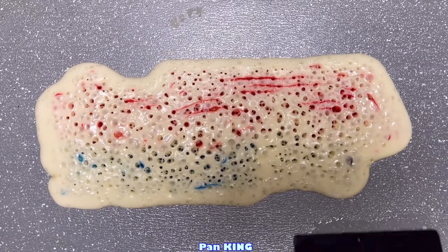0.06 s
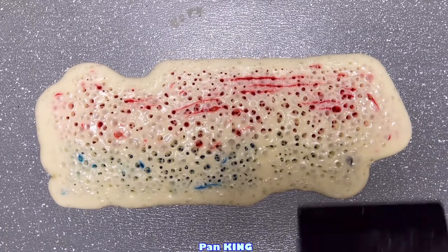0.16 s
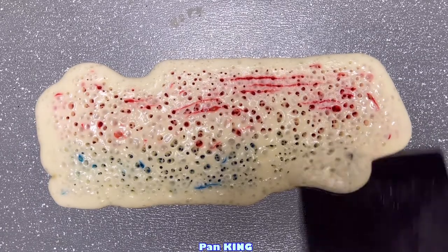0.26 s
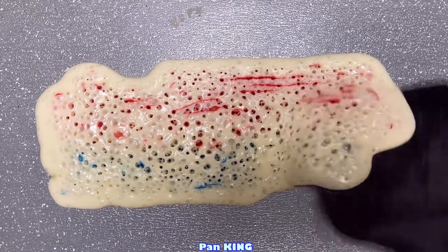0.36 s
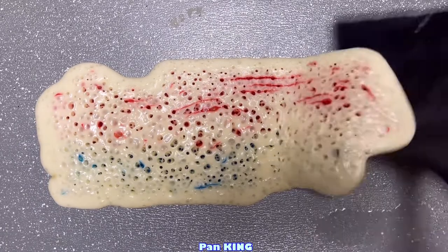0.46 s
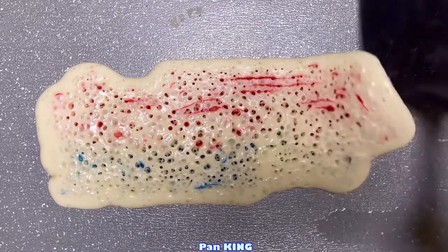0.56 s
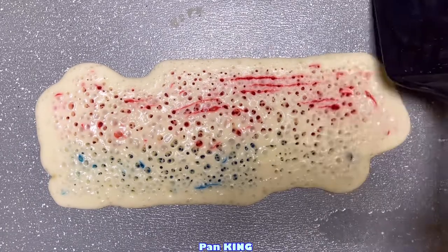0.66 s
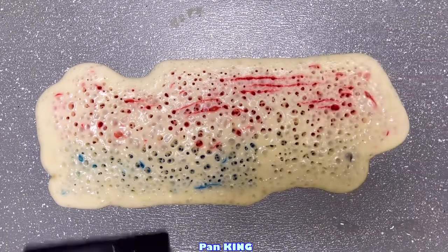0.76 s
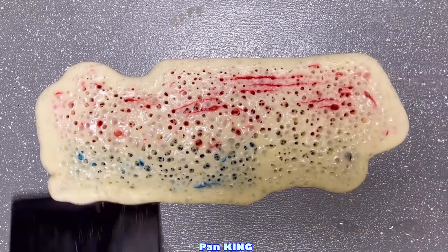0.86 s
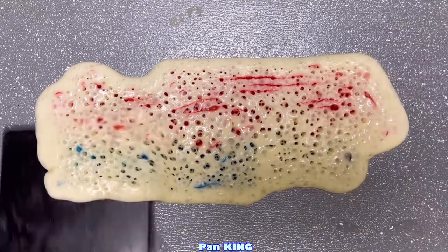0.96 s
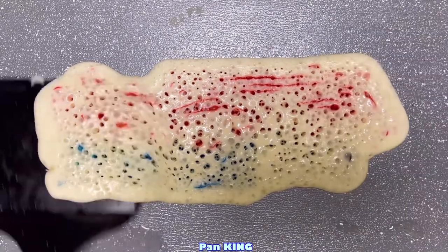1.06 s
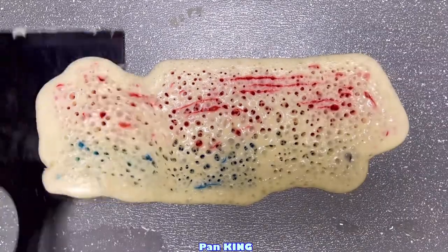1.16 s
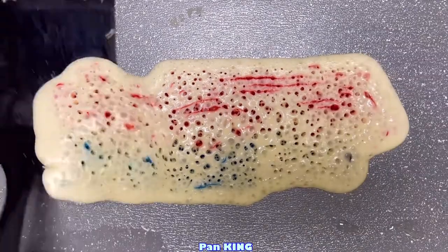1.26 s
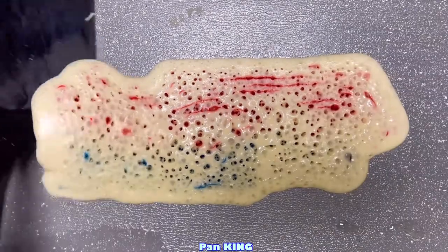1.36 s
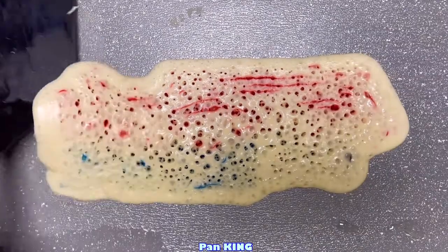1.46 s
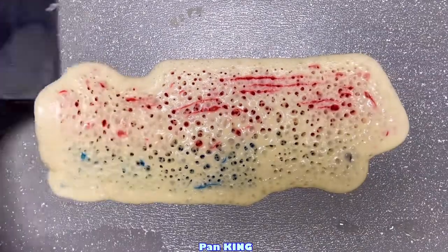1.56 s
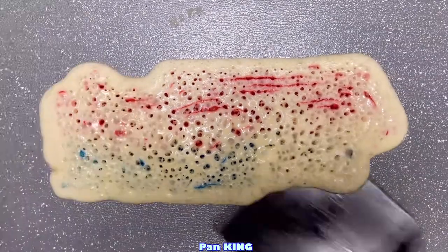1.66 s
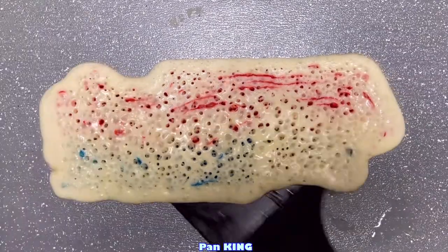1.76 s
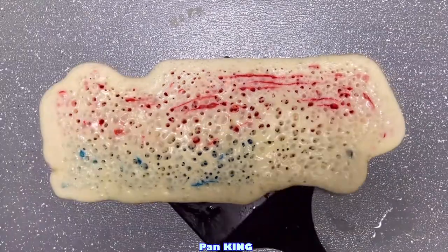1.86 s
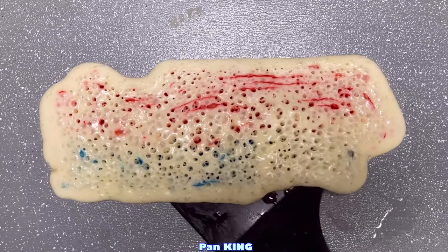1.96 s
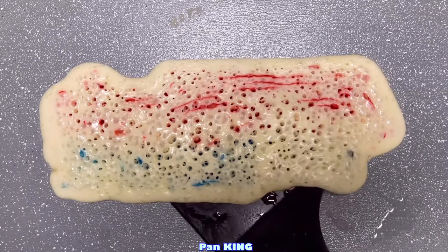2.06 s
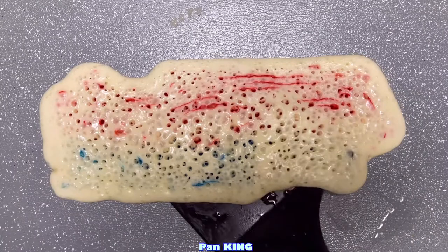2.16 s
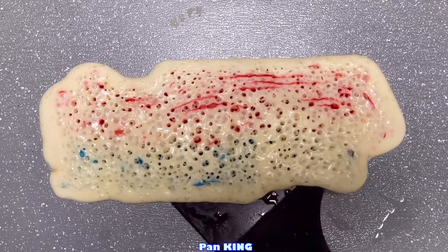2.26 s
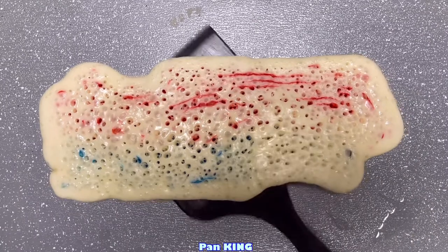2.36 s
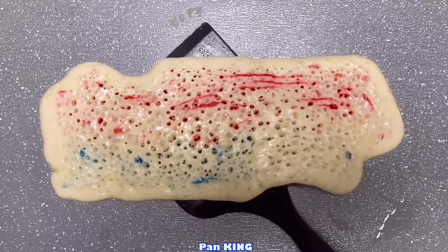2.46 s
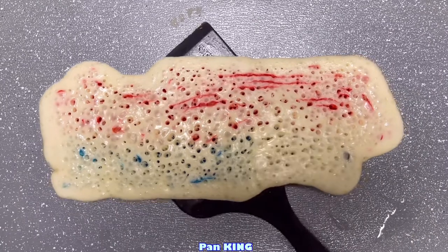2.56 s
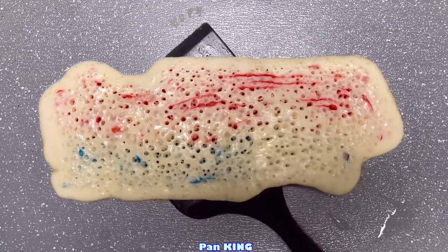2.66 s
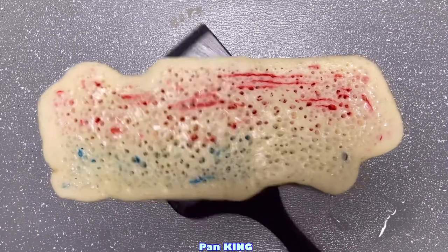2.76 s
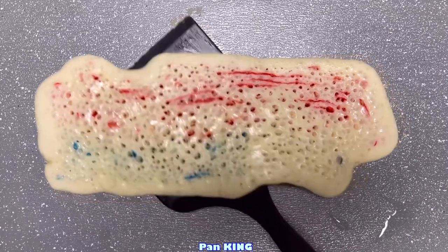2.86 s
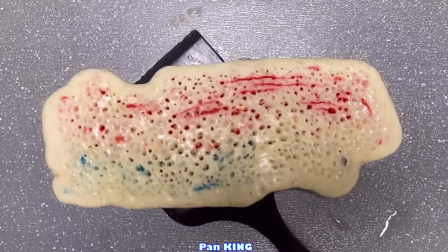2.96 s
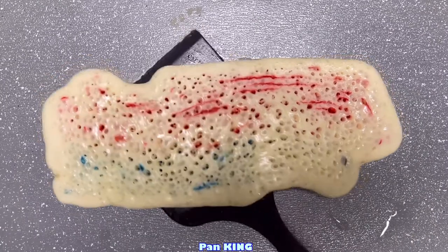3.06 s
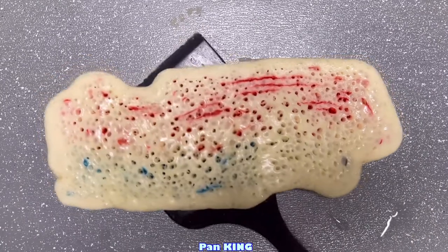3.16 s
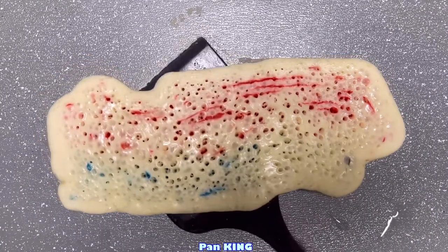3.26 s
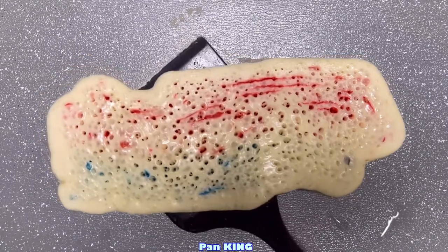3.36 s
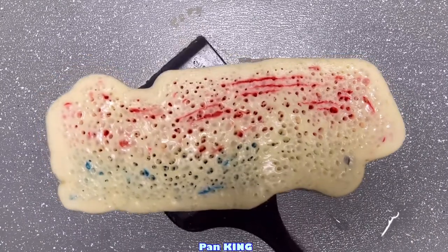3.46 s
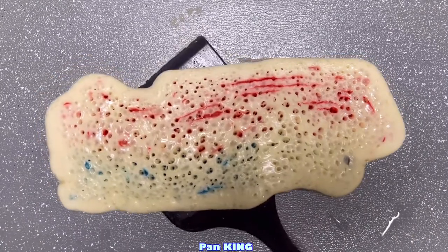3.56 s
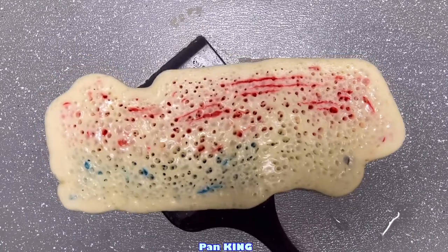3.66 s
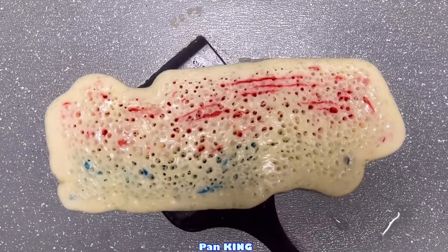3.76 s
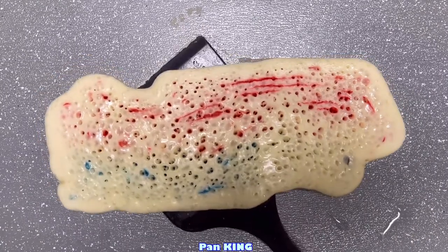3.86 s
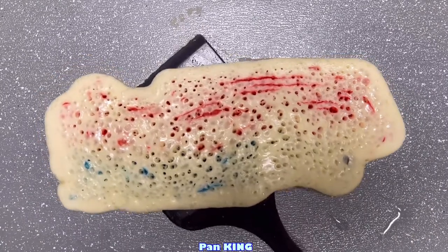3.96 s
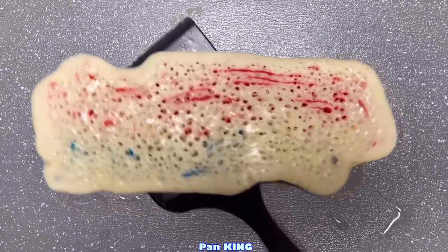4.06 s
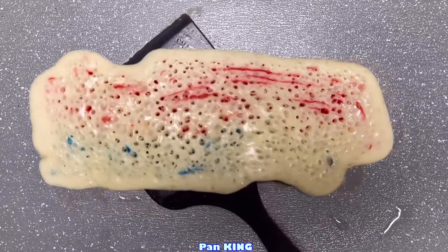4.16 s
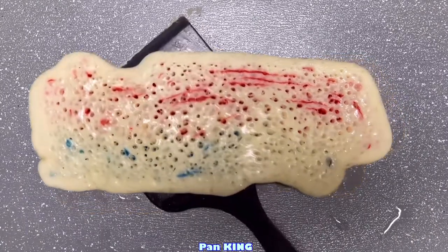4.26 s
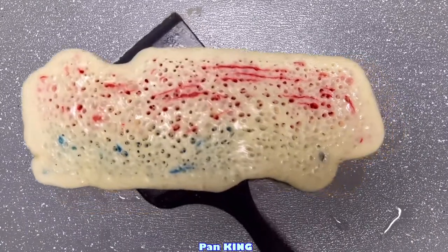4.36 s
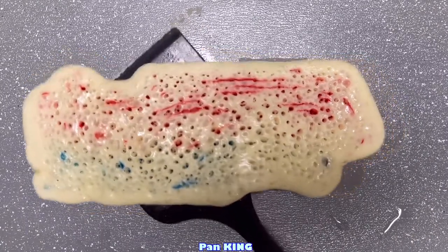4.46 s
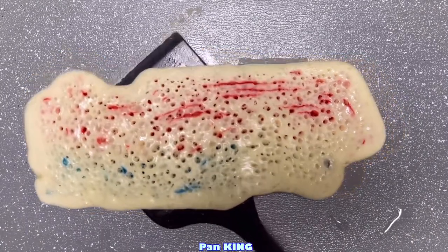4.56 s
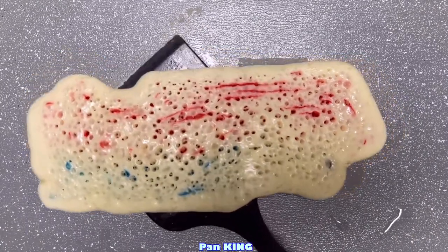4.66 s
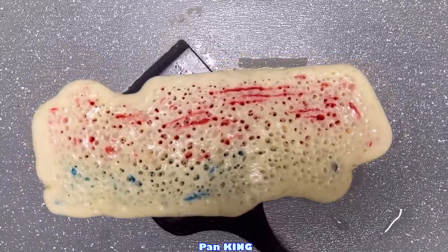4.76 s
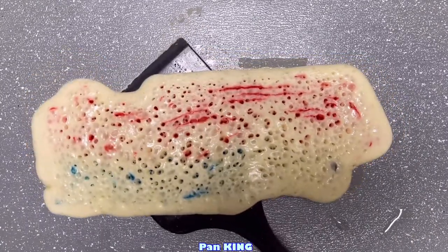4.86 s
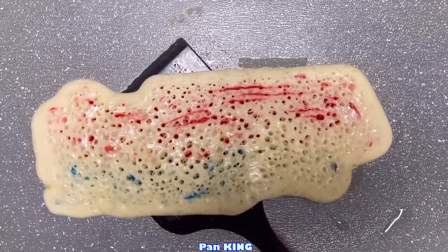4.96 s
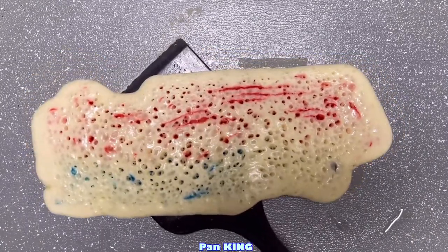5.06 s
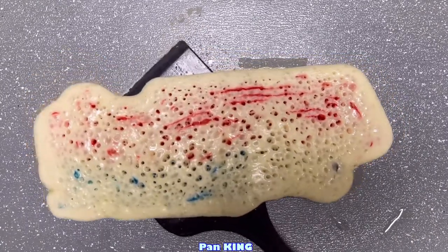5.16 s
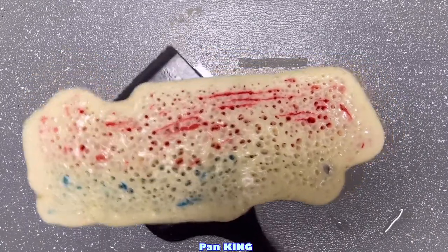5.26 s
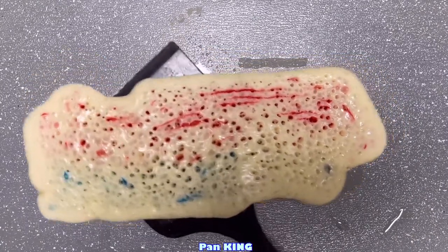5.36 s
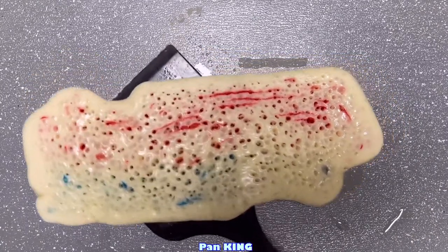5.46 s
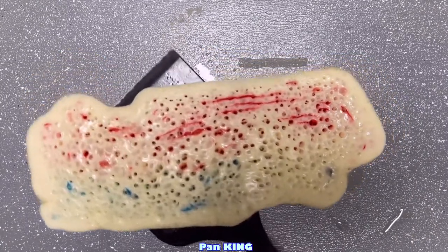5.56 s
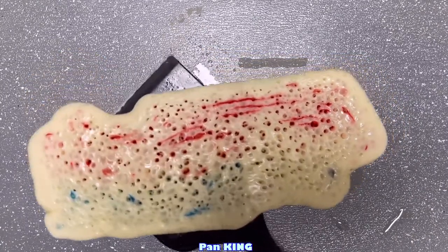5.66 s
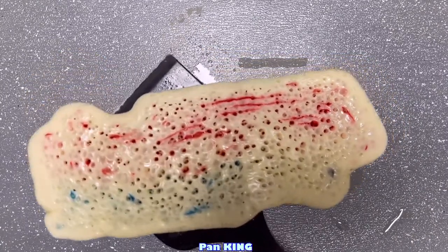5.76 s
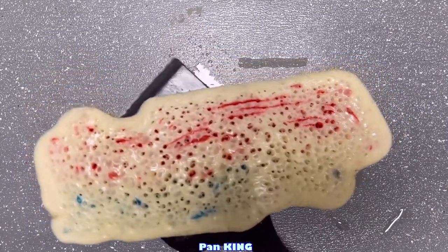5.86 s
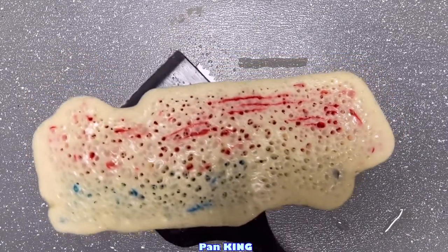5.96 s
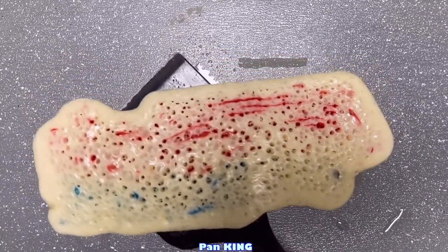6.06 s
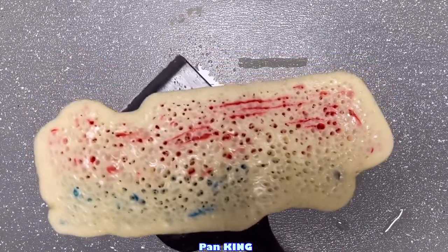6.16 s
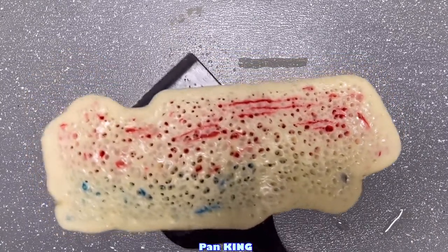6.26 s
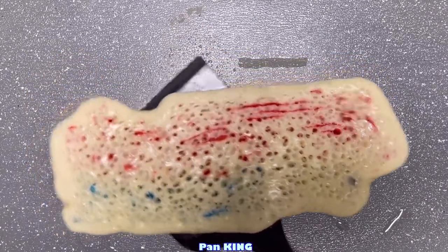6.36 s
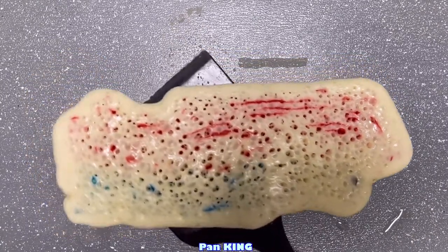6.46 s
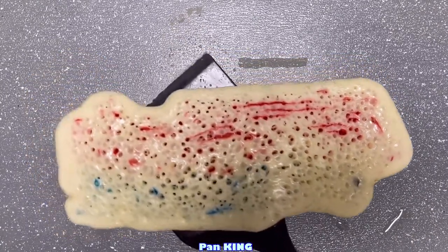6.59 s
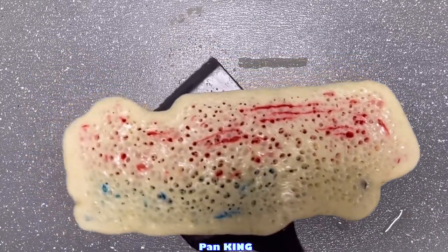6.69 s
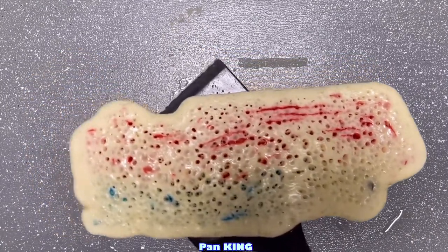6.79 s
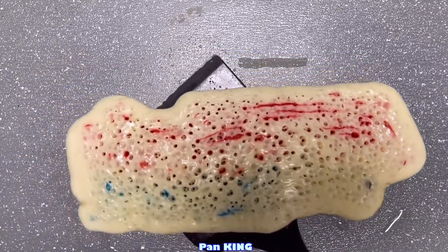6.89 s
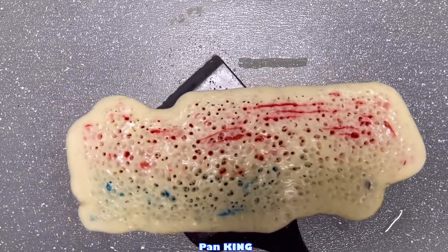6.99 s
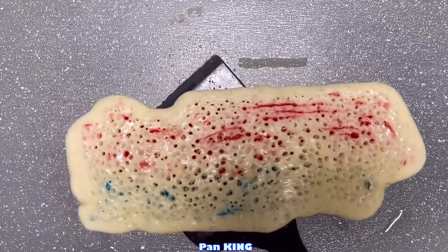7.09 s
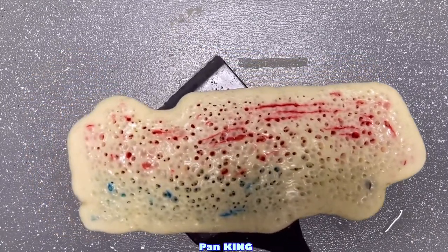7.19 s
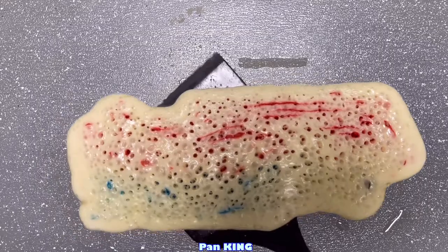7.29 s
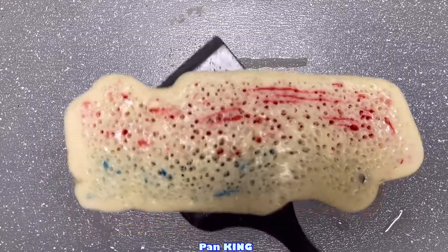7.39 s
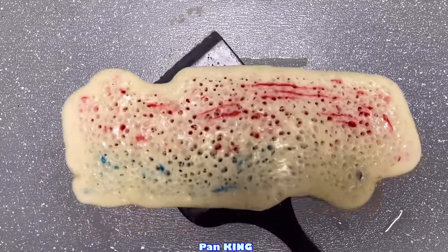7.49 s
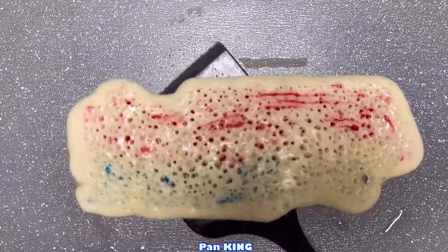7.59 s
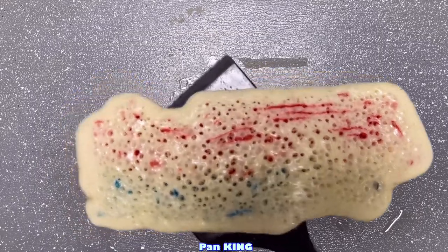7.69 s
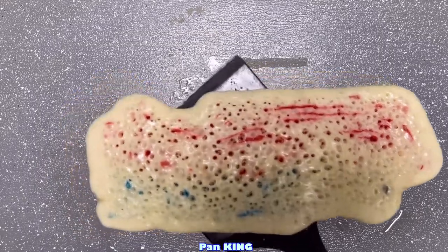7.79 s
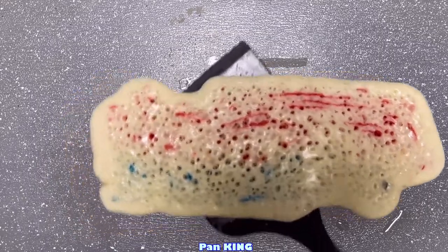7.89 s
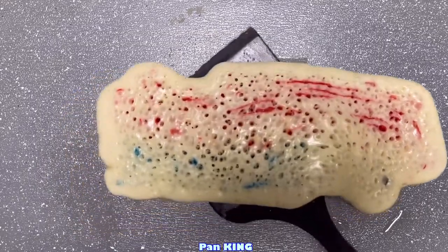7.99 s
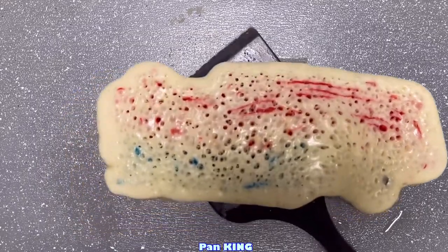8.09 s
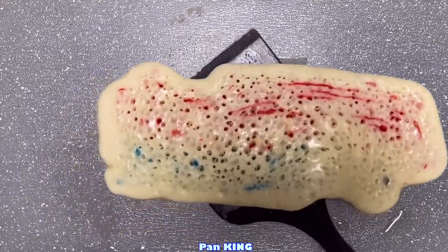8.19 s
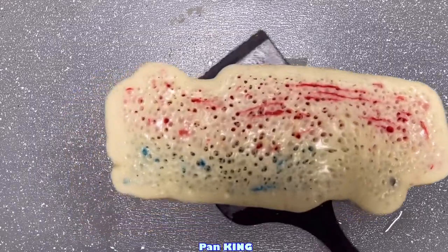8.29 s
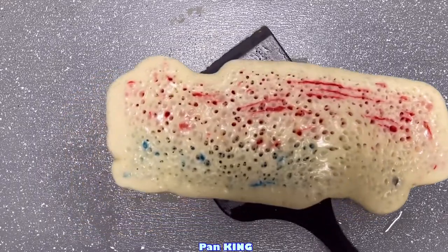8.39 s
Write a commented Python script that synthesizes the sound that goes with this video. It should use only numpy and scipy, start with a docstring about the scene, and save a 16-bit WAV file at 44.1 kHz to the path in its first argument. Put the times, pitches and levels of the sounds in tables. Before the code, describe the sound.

A spatula edge works on a speckled metal plate: a swelling scrape, a nasal rasp, a strong clank with a short ring, more knocks and gritty hisses. After a sharp scrape and a smaller one past two seconds, it nearly stops. Soft ticks cluster around five seconds, one firmer knock follows, then faint rubbing. Low air and soft rumble lie beneath, with a short room echo.

```python
"""A quiet kitchen hums under a spatula stroke that is already swelling, close to a two-port microphone.
The blade works under a pancake on a speckled steel griddle: its edge hisses in short strokes (patchy noise)
and the grit under it makes the plate drone (uneven grains through resonant modes). An early rasp is noise
on a gliding carrier, a lifted blade leaves one mode ringing, and knocks are decaying modes with a crack.
The kitchen adds steady air, a rumble that swells with pushes of the counter, and a short echo."""
import sys
import numpy as np
from scipy import signal
from scipy.fft import rfft, irfft, next_fast_len
from scipy.io import wavfile
from scipy.ndimage import uniform_filter1d, map_coordinates

SR = 44100
rng = np.random.default_rng(int(sys.argv[2]) if len(sys.argv) > 2 else 0)


def output_pcm(signal):
    """Save a mono or channel-first signal as 16-bit PCM at the path in sys.argv[1].

    Samples are clipped to [-1, 1] before scaling.
    """
    pcm = np.clip(np.atleast_2d(signal).T, -1, 1) * 32767
    wavfile.write(sys.argv[1], SR, np.round(pcm).astype(np.int16))


N = 371763  # length in samples


def amp(db):
    """Amplitude factor of a level in dB."""
    return 10 ** (np.asarray(db) / 20)


def unit(x):
    """x scaled to an rms of 1."""
    return x / np.sqrt(np.mean(x ** 2) + 1e-20)


def along(points, hz):
    """Values at hz, joining (Hz, value) points on a log frequency axis."""
    point_hz, values = np.transpose(points)
    return np.interp(np.log(hz + 1), np.log(point_hz + 1), values)


def curves(rows):
    """One value per sample for each column after the time."""
    seconds, *columns = np.transpose(rows)
    return [np.interp(np.arange(N) / SR, seconds, column) for column in columns]


def wobble(rate):
    """A smooth random curve with this many knots a second."""
    knots = rng.standard_normal(int(N * rate / SR) + 4)
    return map_coordinates(knots, [np.arange(N) * rate / SR])


def filtered(x, response):
    """x filtered by a response given as a function of frequency; the padding stops wrap-around."""
    size = next_fast_len(N + SR)
    spectrum = rfft(x, size) * response(np.fft.rfftfreq(size, 1 / SR))
    return irfft(spectrum, size)[..., :N]


def band(x, lo_hz, hi_hz):
    """Rms of x between two frequencies."""
    inside = filtered(x, lambda hz: (hz > lo_hz) & (hz < hi_hz))
    return np.sqrt(np.mean(inside ** 2))


def patchy(depth_db):
    """Noise with patches of random gain in time and frequency."""
    z = signal.stft(rng.standard_normal(N), nperseg=256)[2]
    field = uniform_filter1d(rng.standard_normal(z.shape), size=4, axis=0)
    field = uniform_filter1d(field, size=10, axis=1)
    return signal.istft(z * amp(depth_db * unit(field)), nperseg=256)[1][:N]


def air(spectrum, apart):
    """Stereo noise of rms 1, mostly shared by both ports, with a weaker part of its own at each."""
    shared, left, right = (patchy(depth_db=1.23) for _ in range(3))
    both = shared + apart * np.array([left, right])
    return unit(filtered(both, lambda hz: amp(along(spectrum, hz))))


# Pushes of the counter. Each row: peak of the swell in seconds, level there in dB.
COUNTER_PUSHES = [(.2, -54), (.56, -53), (.81, -47.5), (1.1, -58.5), (1.62, -48.5), (2.3, -51), (2.76, -54),
                  (3.97, -63), (5.299, -57), (5.75, -62), (6.271, -55), (8.099, -62.5), (8.35, -60.5)]
RUMBLE_DB, PUSH_RISE_DB_PER_S, PUSH_FALL_DB_PER_S = -64, 201.5, 70.5


def rumble():
    """Gain of the rumble: a steady floor, with a quick swell and a slower ebb for each push."""
    t = np.arange(N) / SR
    power = amp(RUMBLE_DB) ** 2
    for peak_s, db in COUNTER_PUSHES:
        drop_db = np.maximum(PUSH_RISE_DB_PER_S * (peak_s - t), PUSH_FALL_DB_PER_S * (t - peak_s))
        power = power + amp(db - drop_db) ** 2
    return np.sqrt(power)


# Colour of the room air. Each row: frequency in Hz, relative level in dB.
AIR_COLOUR = [(100, -20), (220, -0.5), (400, -16), (600, -16), (1200, -29.5), (3000, -38), (7000, -43),
              (11500, -39), (12600, -53.5), (13200, -83)]
# Colour of the low rumble. Each row: frequency in Hz, relative level in dB.
RUMBLE_COLOUR = [(15, -32.5), (30, 5), (65, 13), (125, 11.5), (200, 7), (330, -46.5)]
AIR_DB = -67.5  # rms


def kitchen():
    """Room air, nearly steady, over a low rumble that follows the pushes."""
    steady = amp(AIR_DB + .7 * wobble(2.5))
    return steady * air(AIR_COLOUR, apart=0.11) + rumble() * air(RUMBLE_COLOUR, apart=0.17)


# Strokes of the edge. Each row: start of full speed in seconds, rise, hold and fall in seconds,
# hiss level in dB, low and high drone in dB over the hiss before a trim in scrape().
EDGE_STROKES = [ (0.144, .25, 0.042, 0.22, -54, 6, 2), (0.231, 0.11, 0.09, .25, -47.5, 9, 4),
                (0.404, 0.087, 0.0091, 0.19, -44.5, -10, 3), (0.528, 0.0035, 0.015, 0.093, -52, 1, 11),
                (0.67, 0.024, 0.025, .05, -75, 1, 8.5), (0.754, 0.0037, .003, 0.16, -43, 0.5, -9),
                (0.85, 0.13, 0.0064, 0.12, -43.5, 6, -3), (0.9, 0.14, 0.0087, 0.31, -47, -2, -0.5),
                (1.049, .1, 0.0092, 0.26, -50, -3, -7), (1.168, 0.26, .02, .12, -54.5, -11, -12),
                (1.305, 0.6, 0.026, 0.48, -70.5, -1, -4), (1.54, .15, 0.035, 0.038, -75, -5.5, 2),
                (1.566, .004, 0.042, 0.17, -33, -5, -2), (1.587, 0.026, 0.0023, 0.033, -36.5, -4, 9),
                (1.813, 0.027, .005, 0.033, -73.5, 16, 16), (1.863, 0.088, 0.0044, 0.097, -65.5, 3, 3),
                (2.234, 0.026, .005, 0.14, -53.5, -16.5, -15.5),
                (2.281, 0.041, .003, 0.061, -39.5, -1.5, -23), (2.357, 0.0064, 0.004, 0.11, -61, 7, 10.5),
                (2.644, 0.35, .005, 0.11, -79.5, 12.5, 14), (2.702, 0.015, 0.039, 0.045, -53.5, -6.5, -10),
                (2.864, 0.16, 0.013, 0.078, -65.5, 0, -6), (3.012, 0.0028, .004, 0.038, -75, 1, -8.5),
                (3.113, .08, 0.0039, 0.23, -80, 2.5, 3), (3.964, 0.072, 0.037, 0.1, -65.5, 6.5, 0),
                (4.245, .06, .005, 0.11, -73, 8, -7.5), (4.343, 0.07, 0.013, 0.15, -69.5, 9.5, -10),
                (4.636, 0.096, .01, 0.17, -76, -2.5, -2), (4.888, 0.0038, .008, 0.053, -73.5, 15.5, -9.5),
                (5.142, 0.043, 0.0059, 0.076, -53.5, 15.5, 4), (5.188, .05, 0.035, 0.053, -68, 14.5, 5),
                (5.257, 0.043, 0.051, 0.097, -67.5, 17, 12.5), (5.481, 0.037, 0.058, .06, -71, 17.5, 8),
                (5.802, 0.067, 0.027, 0.026, -67.5, 12.5, 7), (5.844, .004, 0.012, 0.12, -63, 24.5, 16),
                (6.184, 0.11, .005, 0.092, -69.5, 15.5, 10.5), (6.292, 0.05, 0.033, 0.066, -64.5, 4.5, 4.5),
                (6.621, .1, 0.059, 0.076, -70.5, 4.5, -4.5), (6.804, 0.11, .005, 0.12, -80.5, 3, 1),
                (7.041, .1, .01, .1, -82, 8.5, 4.5), (7.264, .06, 0.037, 0.13, -61.5, 12.5, 7.5),
                (7.546, 0.13, 0.16, 0.073, -69.5, -7, -20), (7.785, 0.088, 0.099, 0.17, -68.5, -5, 1.5),
                (8.245, 0.092, 0.0046, 0.089, -65, -19.5, -7), (8.301, .06, .003, 0.042, -61.5, -20, -15.5),
                ]
# Faint drones while the blade barely moves. Each row: time in seconds, low drone in dB before the trim.
RESTING_DRONE = [(0, -107), (1.4, -73.5), (2.0, -69.5), (3.1, -69), (3.6, -81), (4.3, -71.5), (4.8, -75),
                 (5.4, -58), (6.1, -64), (6.6, -68.5), (7.3, -67.5), (8.43, -70)]
REST_HIGH_DB = -11  # the high drone at rest, over the low one
SPAN_DB = 30  # the hiss gains this much over a rise and loses it over a fall
RISE_BEND, FALL_BEND = 1.224, 1.167  # exponents: the level rounds off near full speed
LOW_SWING, HIGH_SWING = 0.8, 1  # share of the span for each drone; the low one lingers


def strokes():
    """Rows of time and the hiss, low and high drone levels; every stroke rises, holds and falls by one rule."""
    t = np.arange(0, N / SR + .002, .001)
    start, rise, hold, fall, hiss_db, low_db, high_db = np.transpose(EDGE_STROKES)[:, :, None]
    early = np.maximum(start - t, 0) / rise
    late = np.maximum(t - start - hold, 0) / fall
    lost_db = SPAN_DB * (early ** RISE_BEND + late ** FALL_BEND)
    rest_db = np.interp(t, *np.transpose(RESTING_DRONE))
    layers = [(0, 1, -120), (low_db, LOW_SWING, rest_db), (high_db, HIGH_SWING, rest_db + REST_HIGH_DB)]
    levels = []
    for over_db, swing, floor_db in layers:
        moving = np.sum(amp(hiss_db + over_db - swing * lost_db) ** 2, axis=0)
        levels.append(10 * np.log10(moving + amp(floor_db) ** 2))
    return np.column_stack([t, *levels])


def plate(modes, damping):
    """Response of some of the plate's modes; a blade resting on the plate shortens their ring."""
    def response(hz):
        total = 0
        for k, (mode_hz, db, t60) in enumerate(modes):
            width = damping * np.log(1000) / (np.pi * t60)
            loss = 1j * hz * width
            total = total + (-1) ** k * amp(db) * loss / (mode_hz ** 2 - hz * hz + loss)
        return total
    return response


def drone(level_db, response, lo_hz, hi_hz):
    """Grit under the edge shakes the plate in uneven grains; the scale is set between two frequencies."""
    grit = rng.standard_normal(N) * amp(2.0 * rng.exponential(size=N))
    scale = band(filtered(grit, response), lo_hz, hi_hz)
    return filtered(grit * amp(level_db + 0.25 * wobble(130)), response) / scale


# Modes of the griddle plate, also rung by the knocks. Each row: frequency in Hz, relative level in dB,
# ring time in seconds (divided by the damping under the blade; a knock's mode falls 90 dB in it).
PLATE_MODES = [(327, 0, .2), (440, -1, .12), (750, 0, .13), (905, -3, .12), (969, -5, .25), (1100, -8, .28),
               (1260, -5, .16), (1390, -5, .1), (1610, -8, .12), (1723, -8, .1), (1830, -6, .2),
               (1957, -9, .15), (2180, -15, .1), (2310, -15, .09), (2600, -18, .07), (2930, -18, .09)]
# Colour of the edge's hiss. Each row: frequency in Hz, relative level in dB.
HISS_COLOUR = [(150, -41), (400, -7), (1200, -2), (2000, -2.5), (2600, 2), (3300, -2), (4500, -4),
               (6800, -9), (9000, -1), (11800, -2.5), (12800, -11.5), (13250, -42)]
TOP_FADE_HZ, TOP_FULL_DB, TOP_FADE_GROWS = 11900, -46, .8  # corner; hiss level; extra dB lost per dB below it
FAST_FROM_DB, FAST_FULL_DB, PIVOT_HZ = -50, -29, 1110  # hiss levels over which the high drone tilts


def scrape():
    """The edge rides the speckles: a hiss and two drones of the plate."""
    hiss_db, low_db, high_db = curves(strokes())
    catch = wobble(40)  # the edge catches and lets go
    stutter = 1.8 * catch + 1.3 * wobble(14)  # the low modes answer in separate bumps
    hiss = filtered(patchy(depth_db=2.0), lambda hz: amp(along(HISS_COLOUR, hz)))
    # the hiss above about 12 kHz fades further when the hiss is weak
    top = filtered(hiss, lambda hz: 1 / (1 + (TOP_FADE_HZ / (hz + 1)) ** 30))
    top_gain = amp(TOP_FADE_GROWS * np.minimum(hiss_db - TOP_FULL_DB, 0))
    hiss = hiss - top * (1 - top_gain)
    hiss = amp(hiss_db + 0.92 * catch) * hiss / band(hiss, 2100, 9500)
    low_modes, high_modes = plate(PLATE_MODES[:2], damping=3.5), plate(PLATE_MODES[2:], damping=4.3)
    low = drone(low_db - 3 + stutter, low_modes, 280, 600)  # both drones are trimmed by 3 dB
    high = drone(high_db - 3 + 1.5 * catch, high_modes, 650, 1200)
    # faster strokes tilt the high drone towards its upper modes
    fast = np.clip((hiss_db - FAST_FROM_DB) / (FAST_FULL_DB - FAST_FROM_DB), 0, 1)
    high = (1 - fast) * high + fast * filtered(high, lambda hz: hz / PIVOT_HZ)
    return hiss + low + high


def gliding(db, hz, shape):
    """A sine carrier that follows hz, at level db, times shape."""
    return np.sqrt(2) * amp(db) * shape * np.sin(2 * np.pi * np.cumsum(hz) / SR)


# Rasp of the flexing blade. Each row: time in seconds, level in dB before a trim, centre in Hz.
FLEX_RASP = [(0.14, -49.5, 1030), (0.27, -34, 1120), (0.354, -54, 1030), (0.392, -52, 981.5),
             (0.4, -34, 1012), (0.472, -42, 1633), (0.5, -71, 1660)]
# One mode rings freely while the blade is lifted. Each row: time in seconds, mean level in dB.
LIFTED_RING = [(.56, -50), (.6, -52), (.63, -62), (.67, -60), (.735, -61)]
FREE_RING_HZ = 541


def blade():
    """The flexing blade's rasp, a narrow noise band that ends higher, and the free ring, an unsteady tone."""
    rasp_db, rasp_hz = curves(FLEX_RASP)
    ring_db, = curves(LIFTED_RING)
    t = np.arange(N) / SR
    spread = unit(filtered(rng.standard_normal(N), lambda hz: 1 / (1 + (hz / 280) ** 2)))
    rasping = np.interp(t, [.08, .14, .5, .52], [0, 1, 1, 0])
    lifted = np.interp(t, [.54, .56, .745, .749], [0, 1, 1, 0])
    ring = gliding(ring_db + wobble(30), FREE_RING_HZ + 3 * wobble(40), lifted)
    rasp = gliding(rasp_db - 4.5, rasp_hz, rasping * spread)
    return rasp + ring


# Knocks of the blade on the plate. Each row: peak in seconds, nominal level in dB,
# crack in dB over that level before a trim, brightness in dB per octave.
BLADE_KNOCKS = [(0.398, -24.5, -17, 0), (0.535, -11, -24, 1), (0.751, -33, 3.5, 1),
                (0.791, -19.5, -14, 0.5), (0.848, -26.5, -30, -1), (1.057, -32.5, -30, -4),
                (1.565, -22.5, -9, 5), (1.802, -37.5, -36.5, 9), (2.36, -42.5, -34, 1.5),
                (4.367, -39, -43, -4), (4.674, -40.5, -41, -5), (4.891, -53.5, -22.5, -7.5),
                (5, -41, -34, 3.5), (5.081, -33.5, -34, -6), (5.123, -33.5, -39, -0.5),
                (5.15, -36.5, -36, -2), (5.25, -35.5, -36, -10), (5.393, -41.5, -42, -3),
                (5.428, -43, -40, -2), (5.497, -36.5, -39, -7), (5.717, -37, -45.5, -6.5),
                (5.851, -16.5, -49, -3)]


def knocks():
    """Each contact rings the modes at new strengths, loudest in the first moments while the blade bounces."""
    out, t = np.zeros(N + SR), np.arange(SR // 2) / SR
    hz, level_db, ring_s = np.transpose(PLATE_MODES)[:, :, None]
    chance = rng.standard_normal((len(BLADE_KNOCKS), len(PLATE_MODES), 1))
    for (peak_s, db, crack_db, tilt_db), size in zip(BLADE_KNOCKS, chance):
        reach = amp(level_db + 2.5 * size + tilt_db * np.log2(hz / 800))
        modes = reach * amp(-90 * t / ring_s) * np.sin(2 * np.pi * hz * t)
        ring = np.sum(modes, axis=0) / np.sqrt(np.sum(reach ** 2))
        onset = 1 - np.exp(-t / 0.00074)
        bounce = 0.33 + amp(-60 * t / 0.021)
        ring *= onset * bounce
        crack = signal.lfilter([1, -1], [1, -.3], rng.standard_normal(len(t)))
        crack *= amp(crack_db - 60 * t / 0.014)
        start = round((peak_s - .0015) * SR)  # the blade touches just before the peak
        out[start:start + len(t)] += amp(db) * (amp(-2.5) * ring + amp(-0.5) * crack)
    thin = signal.butter(2, 220, "high", fs=SR, output="sos")  # a thin plate pushes little bass
    return signal.sosfilt(thin, out[:N])


# Decay of the kitchen's answer. Each row: frequency in Hz, time to fall 60 dB in seconds.
ECHO_DECAY = [(200, 0.37), (1500, 0.16), (8000, 0.085)]


def echo(x):
    """The kitchen's answer, different at each port; each frequency dies at its own speed."""
    hz, t, z = signal.stft(rng.standard_normal((2, SR // 2)), SR, nperseg=256)
    decay = amp(-60 * t / along(ECHO_DECAY, hz)[:, None])
    tail = signal.istft(z * decay, SR, nperseg=256)[1]
    tail = tail / np.linalg.norm(tail[0])
    delayed = np.pad(x, (120, 0))[None]  # 120 samples, a little under 3 ms
    return signal.fftconvolve(delayed, tail, axes=1)[:, :N]


# Colour of the echo. Each row: frequency in Hz, gain in dB on the answer.
ECHO_COLOUR = [(250, -11.5), (900, -4), (6500, -9), (9000, -5.5)]


def scene():
    """The spatula with its top rolled off steeply, its echo, and the kitchen."""
    spatula = scrape() + blade() + knocks()
    spatula = filtered(spatula, lambda hz: 1 / (1 + (hz / 13150) ** 90))
    answer = filtered(echo(spatula), lambda hz: amp(along(ECHO_COLOUR, hz)))
    return spatula + answer + kitchen()


# Phase between the ports. Each row: frequency in Hz, radians by which the left port leads.
LEFT_LEAD = [(0, 0), (2000, 0), (2900, .75), (4200, .45), (5100, .65), (6600, .1), (7600, .85),
             (8600, -.05), (10200, -3.1), (12000, -6.25), (12600, -6.6), (13200, -8.5)]
# Strength between the ports. Each row: frequency in Hz, left over right in dB.
LEFT_LOUDER = [(60, 1.6), (200, 5.5), (400, 3), (750, 2), (1500, 3.5), (2800, 5), (5500, 4.5), (9000, 0.5),
               (15000, 0.5)]
TOP_HZ = 16460  # band limit


def record(dry):
    """The two ports differ in strength and phase, half each way; nothing is kept above the band limit."""
    side = np.array([[.5], [-.5]])

    def ports(hz):
        strength = amp(side * along(LEFT_LOUDER, hz))
        phase = side * np.interp(hz, *np.transpose(LEFT_LEAD))
        return strength * np.exp(1j * phase) * (hz < TOP_HZ)

    return filtered(dry, ports)


dry = scene()
out = record(dry)
output_pcm(out)
```